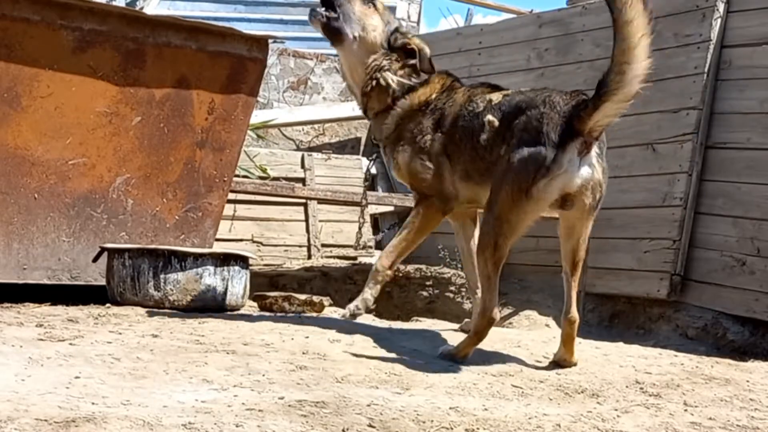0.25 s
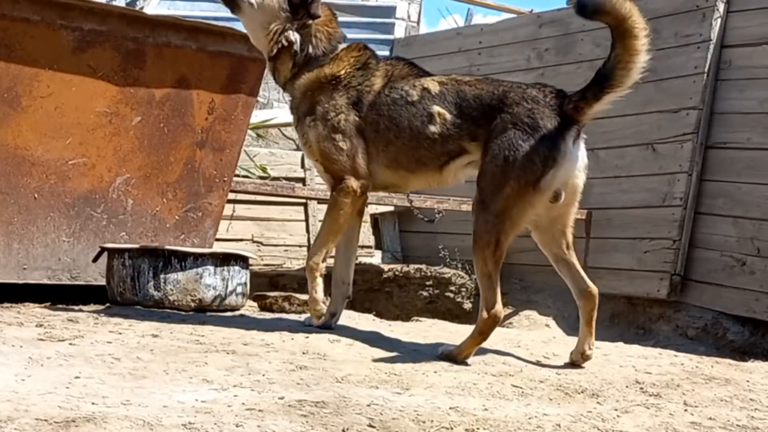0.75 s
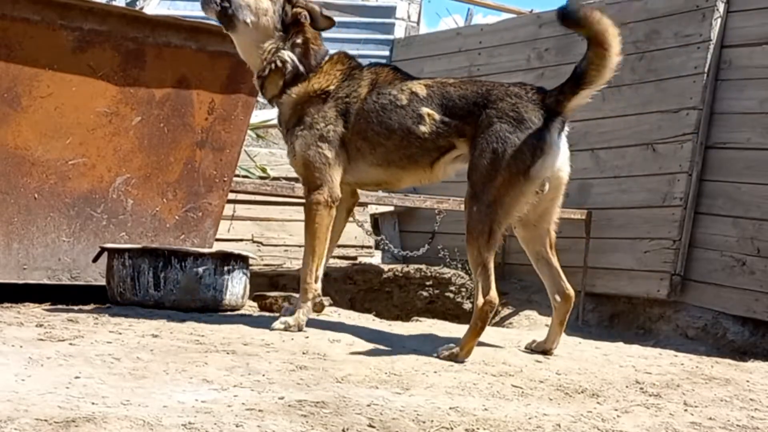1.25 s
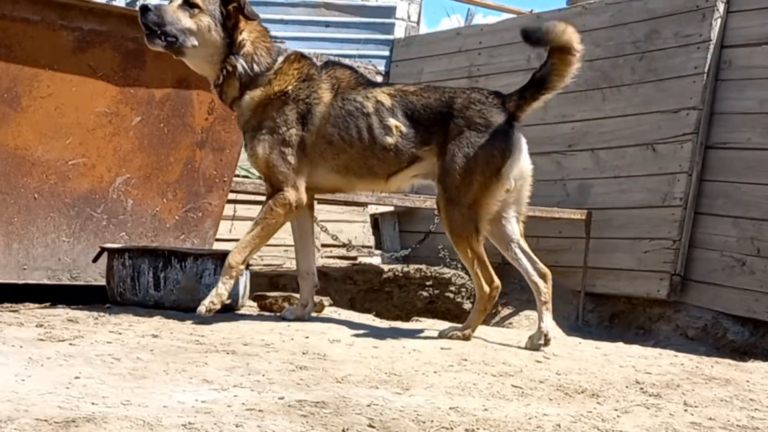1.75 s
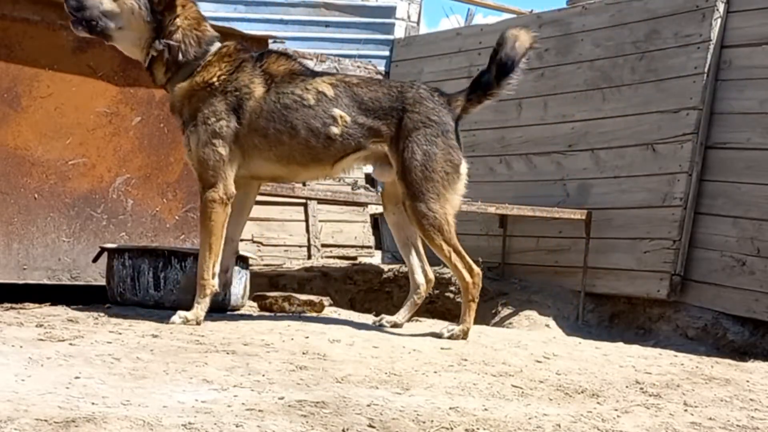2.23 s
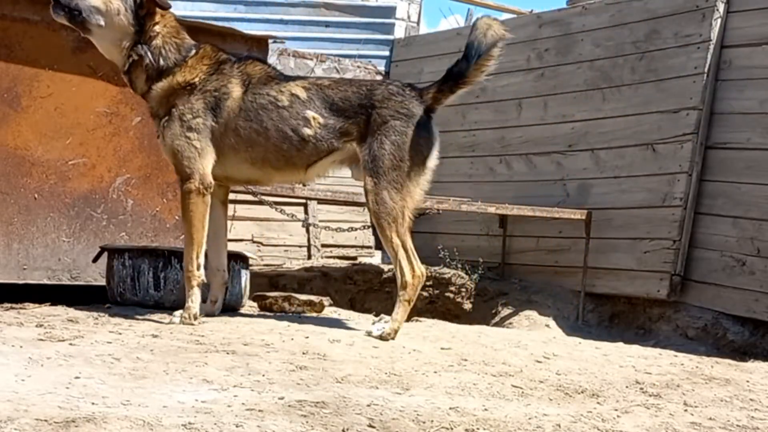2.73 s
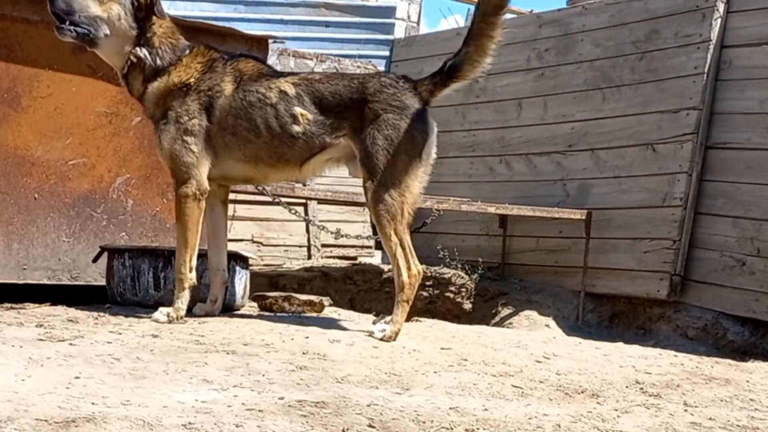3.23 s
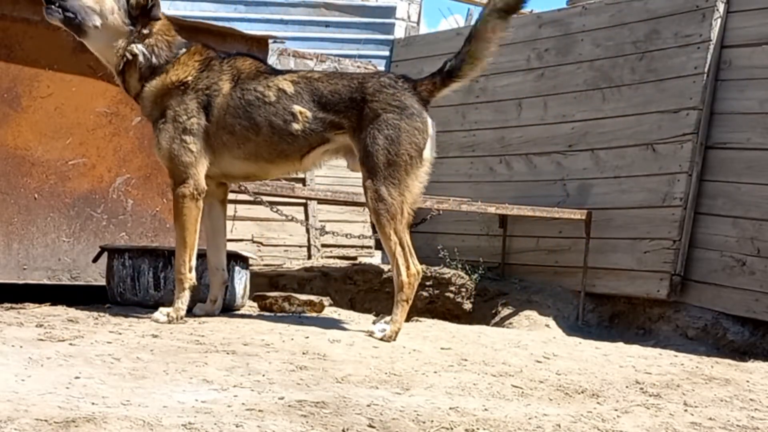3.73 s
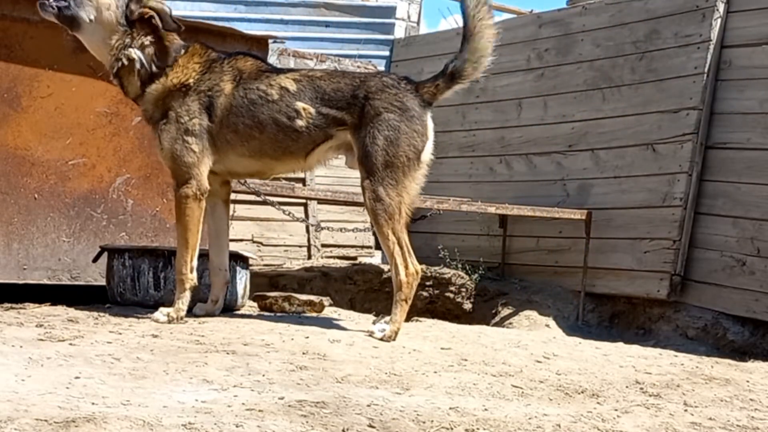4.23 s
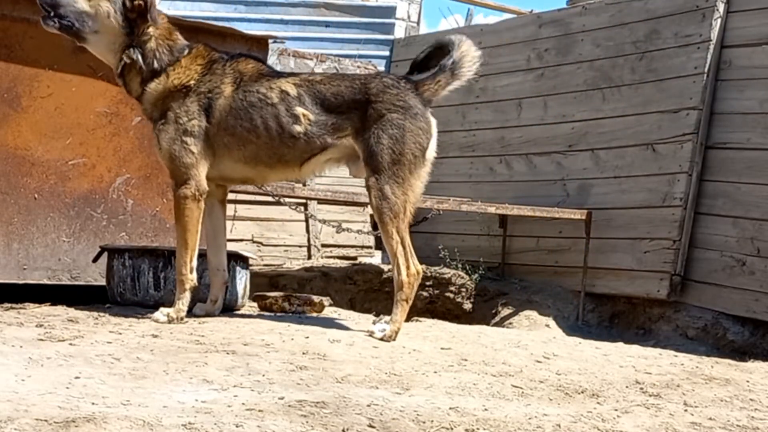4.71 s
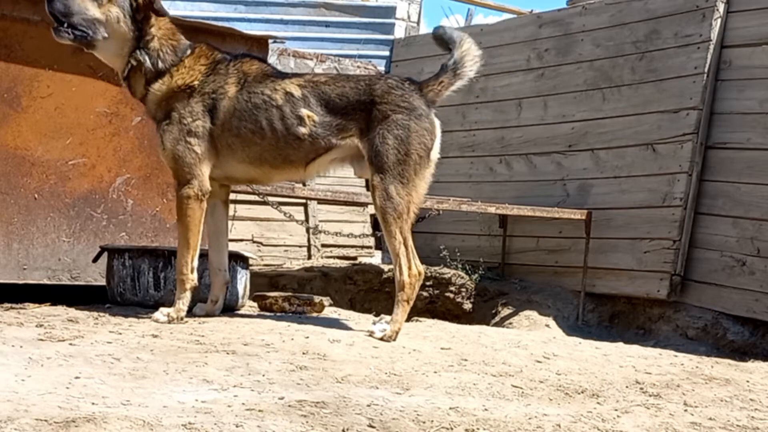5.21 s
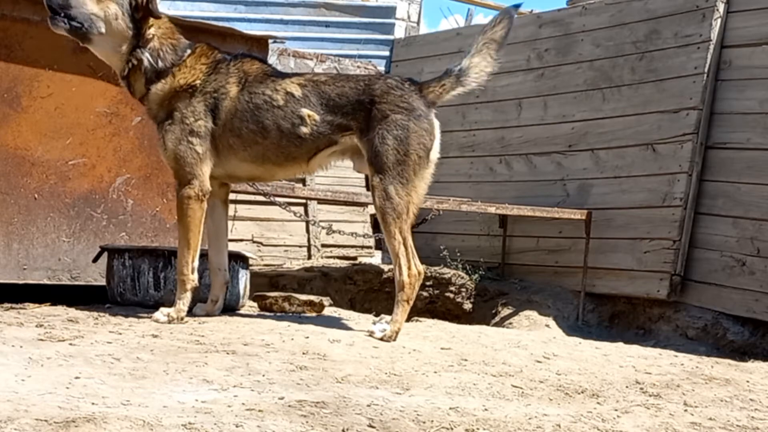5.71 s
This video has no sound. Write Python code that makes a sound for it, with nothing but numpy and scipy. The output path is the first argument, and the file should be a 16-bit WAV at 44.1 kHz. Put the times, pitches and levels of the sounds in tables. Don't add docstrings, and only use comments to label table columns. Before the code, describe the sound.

Loud hollow barks from a large dog, first a rapid run of four, then spaced single ones with raspy creaking breaths between.

```python
import sys
import numpy as np
from scipy import signal
from scipy.fft import rfft, irfft, next_fast_len
from scipy.io import wavfile
from scipy.ndimage import uniform_filter1d, map_coordinates

SR = 44100
rng = np.random.default_rng(int(sys.argv[2]) if len(sys.argv) > 2 else 0)


def wav_out(sig):
    wavfile.write(sys.argv[1], SR, np.round(np.clip(np.atleast_2d(sig).T, -1, 1) * 32767).astype(np.int16))


def makeup_ratio(level_db):
    decades = np.asarray(level_db, float) / 20
    return 10 ** decades


N = 262836


def unit(x):
    return x / np.sqrt(np.mean(x ** 2) + 1e-20)


def along(points, hz):
    f, v = np.transpose(points)
    return np.interp(np.log(hz + 1), np.log(f + 1), v)


def louder(*levels_db):
    return 10 * np.log10(sum(makeup_ratio(2 * db) for db in levels_db) + 1e-14)


def curves(tables):
    t = np.arange(N) / SR
    s, *cols = np.transpose(sorted(row for table in tables for row in table))
    gate = sum((t > table[0][0] - .006) & (t < table[-1][0] + .01) for table in tables) > 0
    return [np.interp(t, s, c) for c in cols] + [uniform_filter1d(1. * gate, size=300)]


def wobble(rate, size=N):
    knots = rng.standard_normal(int(N * rate / SR) + 4)
    return map_coordinates(knots, [np.arange(size) * rate * N / SR / size])


def filtered(x, response):
    m = next_fast_len(N + SR // 2)
    return irfft(rfft(x, m) * response(np.fft.rfftfreq(m, 1 / SR)), m)[..., :N]


def noise(spectrum, channels=1):
    return unit(filtered(rng.standard_normal((channels, N)), lambda hz: makeup_ratio(along(spectrum, hz))))


def tract(modes, f):
    return sum((-1) ** k * makeup_ratio(db) * 1j * f * w / (c * c - f * f + 1j * f * w)
               for k, (c, w, db) in enumerate(modes))


def patchy(x, depth_db):
    z = signal.stft(x, nperseg=512)[2]
    field = uniform_filter1d(rng.standard_normal(z.shape[-2:]), size=5, axis=0)
    field = uniform_filter1d(field, size=12, axis=1)
    return signal.istft(z * makeup_ratio(depth_db * unit(field)), nperseg=512)[1][..., :N]


# (open [s], close [s], level at opening [dB], level at closing [dB])
RUMBLE_OPEN = [
    (0, 0.173, -37, -66),
    (.16, 1.2, -59, -50),
    (1.197, 1.495, -64, -67),
    (1.599, 2.262, -55.5, -56.5),
    (2.474, 2.939, -65, -64),
    (3.469, 3.666, -67.5, -63),
    (4.145, 4.324, -66, -57),
    (4.781, 5.018, -60, -59),
    (5.44, 5.69, -65, -63.5),
]
# (frequency [Hz], density [dB per Hz])
RUMBLE_SPECTRUM = [(15, -59.5), (25, -25), (81, -1), (97, 5), (140, -5), (190, 0.5), (250, -25.5),
                   (420, -120)]
# (frequency [Hz], density [dB per Hz])
RESIDUE_SPECTRUM = [(18, -69), (30, -49.5), (75, -7), (160, -21.5), (178, -2.5), (278, -18.5), (390, 6.5),
                    (1000, -29.5), (1200, -18.5), (1560, -9), (1880, -35), (6260, -44), (15600, -30.5)]


def background():
    t = np.arange(N) / SR
    open_db_per_s, close_db_per_s = 900, 166.5
    levels = []
    for start, end, *ends_db in RUMBLE_OPEN:
        outside_db = open_db_per_s * np.maximum(start - t, 0) + close_db_per_s * np.maximum(t - end, 0)
        levels.append(np.interp(t, [start, end], ends_db) - outside_db)
    level_db = np.max(levels, axis=0)
    shared, own = noise(RUMBLE_SPECTRUM), noise(RUMBLE_SPECTRUM, channels=2)
    rumble = makeup_ratio(level_db - 1.0 + 1.8 * wobble(90)) * (.75 * shared + .65 * own)
    return rumble + makeup_ratio(-77.5 + 3.4 * wobble(5.2)) * noise(RESIDUE_SPECTRUM, channels=2)


# (frequency [Hz], time to fall 60 dB [s])
YARD_DECAY = [(100, 0.15), (300, 0.94), (460, 0.14), (700, 0.19), (1400, 0.12), (3000, 1), (10000, 0.11)]
# (frequency [Hz], level [dB])
YARD_COLOUR = [(100, 8), (460, -3), (1300, 1.5), (2000, -3), (6000, 14)]
# (delay [s], level [dB])
WALL_ECHOES = [
    (.075, -31),
    (.14, -40.5),
    (.21, -49.5),
    (.33, -60.5),
    (0.449, -66.5),
]


def yard(x):
    hz, t, z = signal.stft(rng.standard_normal((2, SR)), SR, nperseg=512)
    decay_db = along(YARD_COLOUR, hz)[:, None] - 60 * t / along(YARD_DECAY, hz)[:, None]
    tail = signal.istft(z * makeup_ratio(decay_db), SR, nperseg=512)[1]
    tail *= makeup_ratio(-15.5) / np.linalg.norm(tail[0])
    for s, db in WALL_ECHOES:
        tail[:, round(s * SR):][:, :2500] += makeup_ratio(db) * rng.standard_normal((2, 2500)) / 50
    return signal.fftconvolve(np.pad(x, (500, 0))[None], tail, axes=1)[:, :N]


# (time [s], lead [samples])
LEFT_LEAD = [(0, 1.84), (.7, 5.04), (1.7, 6.55), (2.5, 7.5), (6, 7.58)]


def ports(x):
    hz, t, z = signal.stft(x, SR, nperseg=1024)
    turn = np.pi * hz[:, None] * np.interp(t, *np.transpose(LEFT_LEAD)) / SR
    tilt_db = along([(300, .5), (700, .2), (2000, .5), (4500, -.5), (9000, 1.4)], hz)
    tilt = makeup_ratio(tilt_db)[:, None]
    pair = [z * tilt * np.exp(1j * turn), z / tilt * np.exp(-1j * turn)]
    return signal.istft(pair, SR, nperseg=1024)[1][:, :N]


# (frequency [Hz], width [Hz], level [dB])
SLACK_THROAT = [(96, 52, -3), (233, 170, -1), (436, 250, 3.5), (627.7, 340, -11), (810, 33, -17.5),
                (1210, 190, -5), (2180, 600, -11)]
# (start [s], peak [s], end [s], peak level [dB])
BREATHS = [
    (-.1, 0.001, 0.18, -36),
    (1.57, 1.655, 1.86, -50),
    (1.66, 1.927, 1.974, -42.5),
    (2.17, 2.214, 2.44, -41),
    (2.44, 2.52, 2.6, -48),
    (2.55, 2.658, 2.75, -48),
]


def rasp(teeth_colour):
    def swell(start, peak, end):
        times = [start - .02, start, peak, end, end + .02]
        return np.interp(np.arange(N) / SR, times, [-4, -1, 0, -1, -4])

    edge_loss_db, teeth_db = 23.5, -19
    throat_db = louder(*[db + edge_loss_db * swell(*times) for *times, db in BREATHS])
    flutter = makeup_ratio(4 * wobble(60))
    air = unit(filtered(flutter * rng.standard_normal(N), lambda f: tract(SLACK_THROAT, f) ** 2))
    teeth = unit(filtered(flutter * rng.standard_normal(N), teeth_colour))
    return makeup_ratio(throat_db + 2.5) * air + makeup_ratio(throat_db + teeth_db + 4.5) * teeth


# (time [s], peak level [dB], snap level [dB])
FOLD_CREAKS = [(0.015, -21.5, -27), (0.039, -20.5, -29), (0.092, -34, -27.5), (0.149, -47, -20.5),
               (0.181, -64.5, -29.5), (1.592, -48.5, -27), (1.609, -49, -20.5), (1.623, -54, -6),
               (1.655, -32.5, -28.5), (1.689, -45.5, -16.5), (1.724, -54, -7.5), (1.757, -35, -20),
               (1.788, -41, -20.5), (1.821, -54.5, -14.5), (1.855, -24, -22), (1.887, -28.5, -15.5),
               (1.943, -32, -22), (2.457, -44, -33), (2.478, -36.5, -31), (2.509, -31, -34),
               (2.532, -37.5, -29), (2.579, -56.5, -9.5), (2.61, -31.5, -28.5), (2.635, -29, -40),
               (2.66, -31, -32.5), (2.685, -38, -26)]
# (time [s], peak level [dB], time to fall 60 dB [s])
JAW_SNAPS = [
    (0.6653, -35, 0.062),
    (2.184, -45, 0.31),
]
# (frequency [Hz], density [dB per Hz])
SNAP_SPECTRUM = [(880, -36.5), (1500, -2), (1810, -6.5), (2600, -5.5), (3290, -0.5), (3810, -4.5),
                 (5920, -16.5), (8430, -25.5), (15600, -19.5)]


def creak():
    pops, snaps, t = np.zeros(N + SR), np.zeros(N + SR), np.arange(SR // 8) / SR
    puff = makeup_ratio(-60 * t / .035)
    for s, db, snap_db in FOLD_CREAKS:
        start = round(s * SR)
        pops[start:][:len(t)] += makeup_ratio(db + 12) * puff * rng.standard_normal(len(t))
        snaps[start:][:len(t)] += makeup_ratio(db + snap_db - 2.5 - 60 * t / 0.11) * rng.standard_normal(len(t))
    for s, db, t60 in JAW_SNAPS:
        snaps[round(s * SR):][:len(t)] += makeup_ratio(db - 4.5 - 60 * t / t60) * rng.standard_normal(len(t))

    def colour(f):
        return makeup_ratio(along(SNAP_SPECTRUM, f) + 15.5) * (1 + tract([(6130, 500, 7.5)], f))

    rung = filtered(pops[:N], lambda f: tract(SLACK_THROAT, f) ** 2)
    return rung + filtered(snaps[:N], colour) + rasp(colour)


# (crest [s], top pitch [Hz], rise [s], fall [s], chest level [dB])
BARK_ARCHES = [
    (0.295, 472.9, .096, 0.12, -7),
    (.593, 469.7, 0.076, 0.13, -7.5),
    (.911, 426.9, .104, 0.11, -13.5),
    (1.249, 427.7, 0.11, 0.09, -15),
    (2.091, 475.3, 0.098, 0.12, -5.5),
    (2.887, 479.1, 0.11, .109, -5.5),
    (3.65, 491.6, .117, 0.097, -8),
    (4.283, 482.6, 0.12, 0.11, -9),
    (4.914, 490.8, 0.11, .11, -6),
    (5.582, 467.8, 0.12, 0.095, -8),
]
# (catch [s], loudest [s], let-go [s])
FIRM_CLOSING = [(.243, .293, .384), (.532, .588, .676), (.835, .92, .982), (1.172, 1.24, 1.302),
                (2.022, 2.13, 2.166), (2.82, 2.852, 2.944), (3.562, 3.648, 3.691), (4.208, 4.285, 4.328),
                (4.85, 4.887, 4.974), (5.525, 5.566, 5.628)]
# (half-pitch share [0-1], lower overtones [dB], throat ring share [0-1],
# swell from catch to loudest [dB], fade from there to let-go [dB])
BARK_MANNER = [(0.5, 0.5, 0.3, 11.5, 10.5), (.96, 4, 1, 14.5, 12.5), (.94, 9, 0.01, 7, 7),
               (0.3, 5.5, 0.7, 7.5, 1.5), (0.7, 2.5, 0.5, 10.5, 6), (0.5, -0.1, 0.2, 8, 9.5),
               (0.14, 1.5, .95, 15, 4.5), (.05, 5, .95, 12, 5), (0.1, 5, 0.8, 10, 8),
               (.3, -1, 0.6, 5.5, 3.5)]
BARK_HOARSE = [.13, .18, .25, .08, .13, .45, .42, .42, .5, .48]
# (overtone pitch over main tone [ratio], jaw resonance at the crest [Hz],
# jaw resonance closing [Hz], mouth level [dB], hiss level [dB])
BARK_GAPE = [(0.93, 1365, 1145, -18, -43.5), (0.93, 1305, 1125, -16.5, -44.5), (0.94, 1255, 1085, -26, -57),
             (0.98, 1265, 1225, -21.5, -51), (0.94, 1390, 1080, -16.5, -44.5),
             (0.95, 1310, 1220, -20.5, -46.5), (0.92, 1295, 1600, -18.5, -44.5),
             (.932, 1255, 1500, -18, -45.5), (0.96, 1280, 1225, -21.5, -47.5),
             (0.95, 1345, 1000, -22, -47.5)]
# (time [s], pitch [Hz], chest level [dB])
HUM_STRETCHES = [
    [(.4, 204.6, -36.5), (.49, 170.5, -42), (.52, 186.4, -29.5), (.75, 181, -38), (.8, 170.9, -38),
     (1.02, 200.5, -40.5), (1.13, 175.3, -36), (1.355, 166.6, -39), (1.4, 140.8, -49.5),
     (1.5, 121.3, -47.5), (1.545, 119.1, -64)],
    [(5.66, 150, -48.5), (5.72, 121.1, -51.5)],
]


def effort():
    t, crests = np.arange(N) / SR, np.array(BARK_ARCHES)[:, 0]
    near = np.searchsorted((crests[1:] + crests[:-1]) / 2, t)
    crest, top, rise, fall, top_db = np.array(BARK_ARCHES)[near].T
    catch, loudest, let_go = np.array(FIRM_CLOSING)[near].T
    *manner, swell_db, fade_db = np.array(BARK_MANNER)[near].T
    ratio, jaw_open, jaw_end, mouth_db, hiss_db = np.array(BARK_GAPE)[near].T
    hum, hum_db, gate = curves(HUM_STRETCHES)
    hum_db = hum_db + 20 * np.log10(abs(gate) + 1e-5)

    def step(s):
        return .5 + .5 * np.tanh(s / .005)

    def drop(lead):
        return ((t + lead - crest) / np.where(t + lead < crest, rise, fall)) ** 2

    def arch(peak, lead, power):
        bark = np.maximum(peak - 300 * drop(lead) ** power, 0)
        return (bark ** 8 + hum ** 8) ** (1 / 8)

    slack_db = -5 * step(catch - t) - 12 * step(t - let_go)
    attack_db_per_s, release_db_per_s = 520.5, 439.5
    edges_db = attack_db_per_s * np.maximum(catch - t, 0) + release_db_per_s * np.maximum(t - let_go, 0)
    edges_db = edges_db + 20 * step(catch - .058 - t)

    def loss(lead, steps, held, edges):
        s = t + lead
        before = np.clip((loudest - s) / (loudest - catch), 0, 1)
        after = np.clip((s - loudest) / (let_go - loudest), 0, 1)
        held_db = swell_db * before ** 1.6 + fade_db * after ** 0.96
        return held * held_db + edges * edges_db - steps * slack_db

    bark_db = top_db - loss(0, 0.91, 0.9, 0.95)
    chest_db = louder(bark_db, hum_db)
    mouth_db = louder(mouth_db - loss(.0021, .55, 1, 1.4), hum_db - 26)
    hiss_db = louder(hiss_db - loss(.005, .38, 1, 1), hum_db - 36.5)
    nose_db = hum_db - 29.5

    jaw_shut_hz, jaw_drop_s = 1110, 0.0083
    opening = jaw_open + (jaw_shut_hz - jaw_open) * np.minimum(drop(0), 1)
    closing = jaw_end + (jaw_open - jaw_end) * np.exp(-abs(t - crest) / jaw_drop_s)
    jaw = np.where(t < crest, opening, closing)

    late = step((t - crest) / 4 + .006)
    manner[0] = manner[0] * (.5 + .5 * late)
    hoarse = np.array(BARK_HOARSE)[near] * (.4 + .6 * late)
    barking = np.clip(makeup_ratio(bark_db - chest_db), 0, 1)
    hum_manner = [.15, 4, .3, .4]
    blend = [h + (b - h) * barking for b, h in zip([*manner, hoarse], hum_manner)]
    tone, pitch = arch(top, 0, 0.97), arch(top * ratio, .004, 1.2)
    return (tone, pitch, chest_db, mouth_db, hiss_db, nose_db, jaw, *blend)


# (frequency [Hz], level [dB])
CHEST_GAIN = [(100, -12), (250, -1), (450, 10.5), (560, 18)]
# (frequency [Hz], width [Hz], level [dB])
MOUTH_MODES = [(655, 140.4, 6.5), (809, 360, 2), (1574, 890, -7.5), (1830, 820, -17)]


def partial_sizes(pitch, jaw, half, lower_db, rough, knots, count):
    size = len(knots)
    order = np.arange(1, count + 1)[:, None]
    hz, odd = order * pitch[knots] / 2, order % 2
    flicker = (rough[knots] + .27) * np.array([wobble(70, size) for _ in range(count)])
    upper = np.clip((hz - 520) / 60, 0, 1)

    low = (1 - upper) * makeup_ratio(along(CHEST_GAIN, hz) - 11.0 * abs(hz / pitch[knots] - 1))
    low = low * np.where(odd, 0.15 * half[knots], 1) * makeup_ratio(2 * flicker)

    modes = MOUTH_MODES + [(jaw[knots], 150, 4)]
    high = upper * abs(tract(modes, hz)) ** 2 * np.where(odd, half[knots], 1)
    bright_db = 4.5 * np.clip((hz - 1450) / 300, 0, 2)
    high *= makeup_ratio(13 * flicker + lower_db[knots] * (hz < 960) + bright_db) / (1 + (hz / 2300) ** 12)

    def steady(sizes):
        return sizes / np.sqrt(abs(uniform_filter1d((sizes ** 2).sum(0), size=28)) + 1e-9)

    return steady(low), steady(high)


def mouth_breath(puffs):
    def response(f):
        return tract(MOUTH_MODES + [(1310, 160, 1.0)], f) * (f > 520) / (1 + (f / 2300) ** 12)

    return unit(filtered(puffs * rng.standard_normal(N), response))


# (time [s], gain [dB], length [s])
FOLD_BREAKS = [(.346, -15, .007), (.591, -26, 0.0028), (.601, 4.5, 0.0056), (.613, -10, .004),
               (0.646, -5.5, 0.0098), (0.862, -10.5, 0.014), (0.891, -14.5, 0.0064), (0.914, -11, 0.0046),
               (0.936, -10, 0.0041), (1.233, -12, .009), (1.266, -14, 0.012), (1.283, 4.5, 0.0084),
               (2.068, -13, .013), (2.114, -14.5, 0.015), (3.595, -5.5, 0.0087), (4.25, -4.5, .012),
               (4.303, -16.5, 0.0057)]
# (frequency [Hz], density [dB per Hz])
THROAT_SPECTRUM = [(100, -21), (200, -11.5), (340, 5), (460, 15), (560, 8), (720, -43.5)]


def stumbling_chest(chest, pitch, ring):
    t = np.arange(N) / SR
    loose = np.clip(ring * (430 - pitch) / 200, .002, .97)
    stumble = makeup_ratio(sum(db * np.exp(-((t - s) / length) ** 2) for s, db, length in FOLD_BREAKS))
    return np.sqrt(1 - loose) * stumble * chest + np.sqrt(loose) * noise(THROAT_SPECTRUM)[0]


# (frequency [Hz], density [dB per Hz])
HISS_SPECTRUM = [(1350, -36.5), (2300, -3), (2530, -4.5), (3000, 0), (3220, -7), (3910, 2), (4340, -4.5),
                 (4660, -10), (5300, -5), (6790, -12), (8300, -29), (10100, -22.5), (11400, -18.5),
                 (14300, -21), (15600, -23)]


def breath_hiss(puffs):
    def pocket(f):
        return makeup_ratio(-22 * np.exp(-((f - 4050) / 400) ** 2))

    source = puffs * makeup_ratio(2.1 * wobble(90)) * rng.standard_normal((2, N))
    hiss = unit(filtered(source, lambda f: makeup_ratio(along(HISS_SPECTRUM, f))))
    return unit(patchy(filtered(hiss, pocket), depth_db=3))


# (frequency [Hz], width [Hz], level [dB])
NOSE_MODES = [(2970, 220, -0.4), (10700, 500, -6.5)]


def nose_air():
    def response(f):
        return tract(NOSE_MODES[:1], f) ** 2 + tract(NOSE_MODES[1:], f) ** 2

    return unit(filtered(rng.standard_normal(N), response))


def voice(count=18, size=8000):
    tone, pitch, chest_db, mouth_db, hiss_db, nose_db, jaw, half, lower_db, ring, rough = effort()
    t, knots = np.arange(N) / SR, np.arange(size) * N // size
    half, rough = np.clip(half, 0, 1), np.clip(rough, 0, 1)
    jitter = 1 + .05 * rough * wobble(150) + .012 * wobble(35)
    phase = np.cumsum(np.pi * pitch * jitter / SR)
    lead = np.cumsum(np.pi * tone / SR)
    low, high = partial_sizes(pitch, jaw, half, lower_db, rough, knots, count)
    chest, mouth = np.zeros((2, N))
    for k, (below, above) in enumerate(zip(low, high), 1):
        chest += np.interp(t, t[knots], below) * np.sqrt(2) * np.sin(k * lead + k * k)
        mouth += np.interp(t, t[knots], above) * np.sqrt(2) * np.sin(k * phase + k * k)
    puffs = 1 + 0.12 * np.sin(2 * phase)
    mouth = np.sqrt(1 - rough) * mouth + np.sqrt(rough) * mouth_breath(puffs)
    chest = stumbling_chest(chest, pitch, ring)
    hiss = breath_hiss(puffs)
    bark = makeup_ratio(chest_db) * chest + makeup_ratio(mouth_db) * mouth + makeup_ratio(hiss_db) * hiss[0] + makeup_ratio(nose_db) * nose_air()
    return bark, makeup_ratio(hiss_db - 1.5) * hiss


def scene():
    bark, scattered = voice()
    dog = bark + creak()
    boards = scattered[::-1] * [[1], [-1]]
    return ports(dog) + boards + yard(dog) + background()


def low_pass(x):
    return signal.sosfilt(signal.butter(12, 15800, fs=SR, output="sos"), x)


def record(dry):
    limited = dry / (1 + abs(dry / 1.05) ** 6) ** (1 / 6)
    mix = filtered(limited, lambda hz: (hz < 15550) / (1 + (48 / (hz + 1)) ** 4))
    return low_pass(mix)


dry = scene()
out = record(dry)
wav_out(out)
```